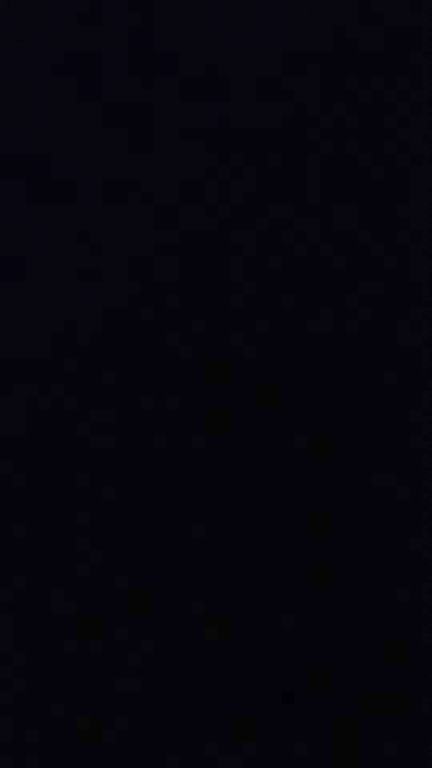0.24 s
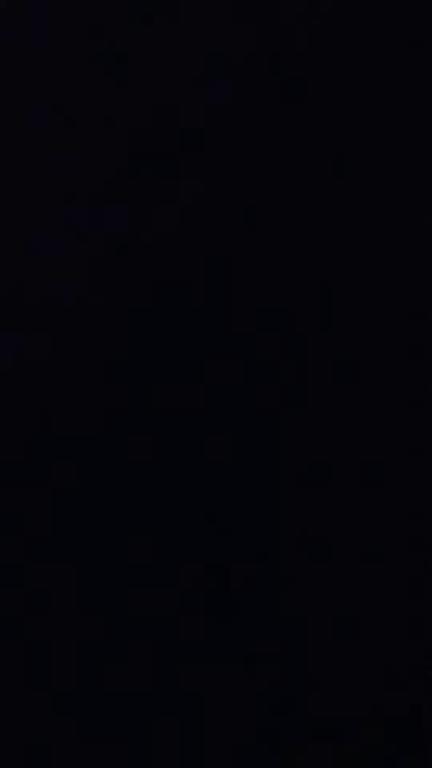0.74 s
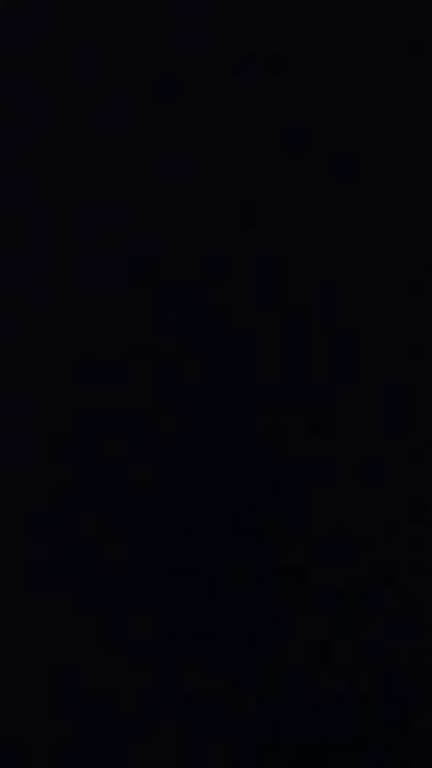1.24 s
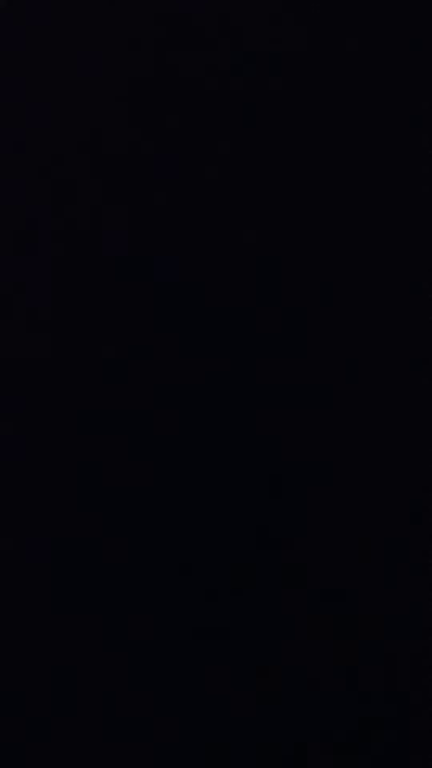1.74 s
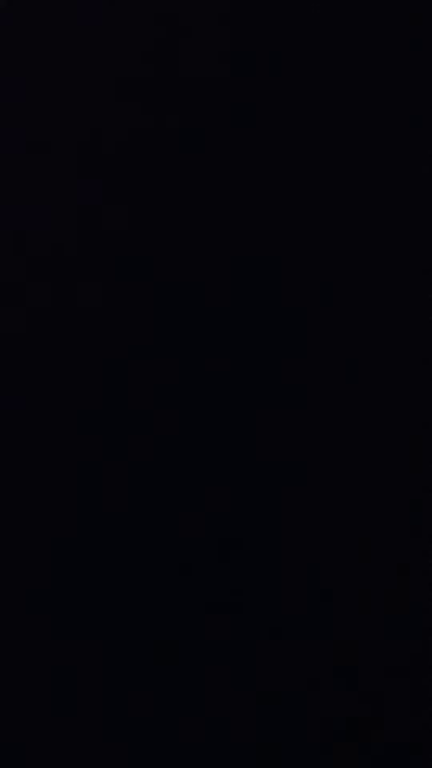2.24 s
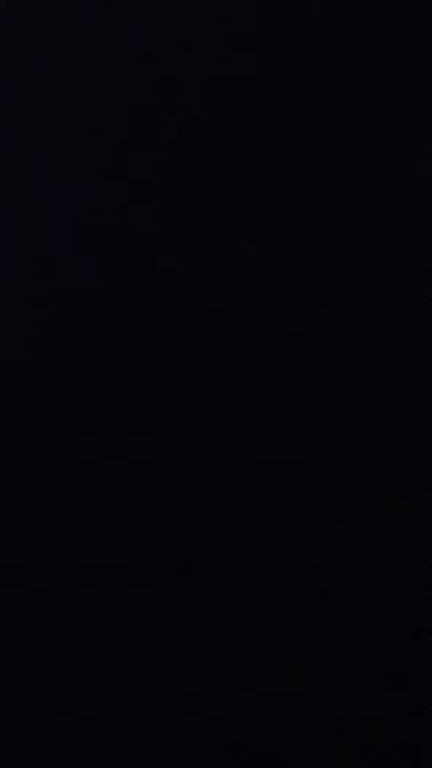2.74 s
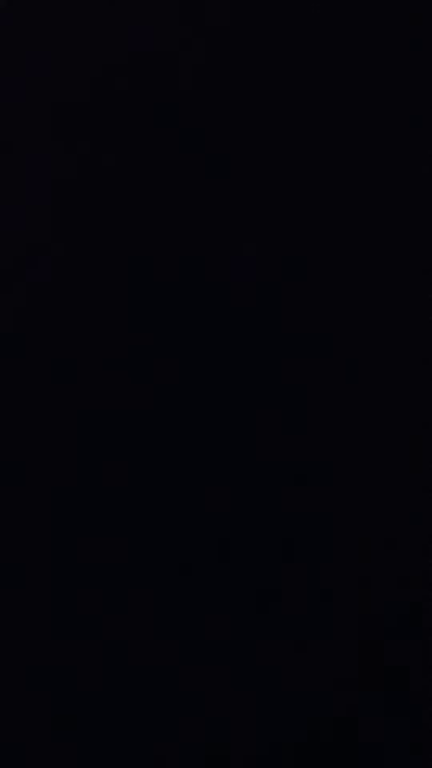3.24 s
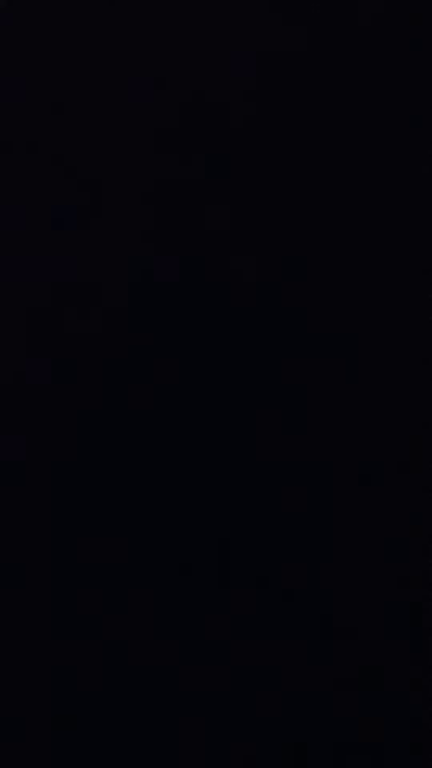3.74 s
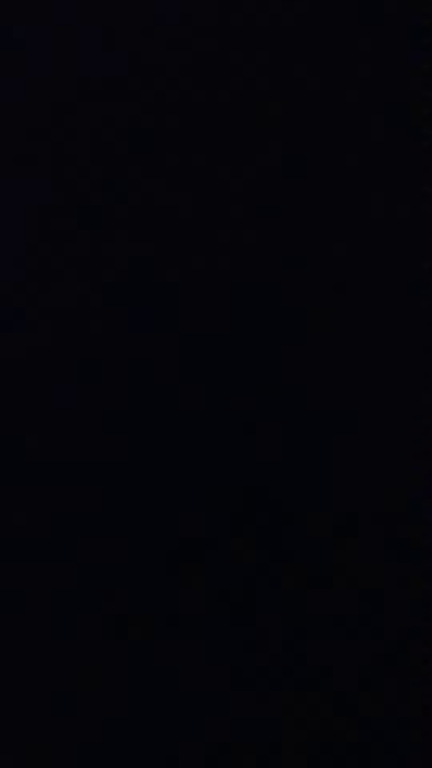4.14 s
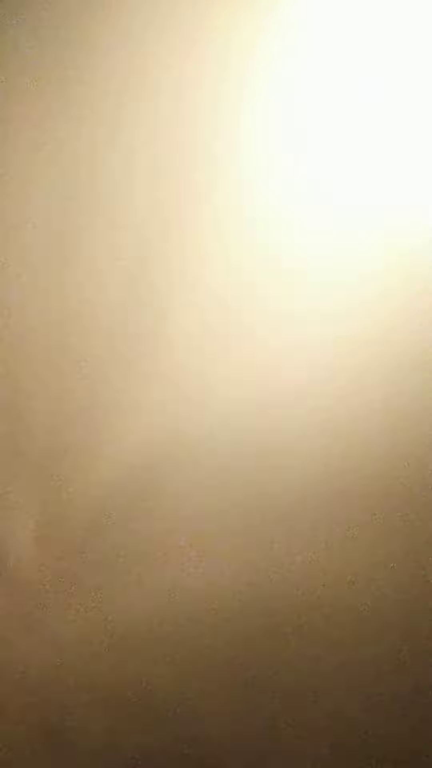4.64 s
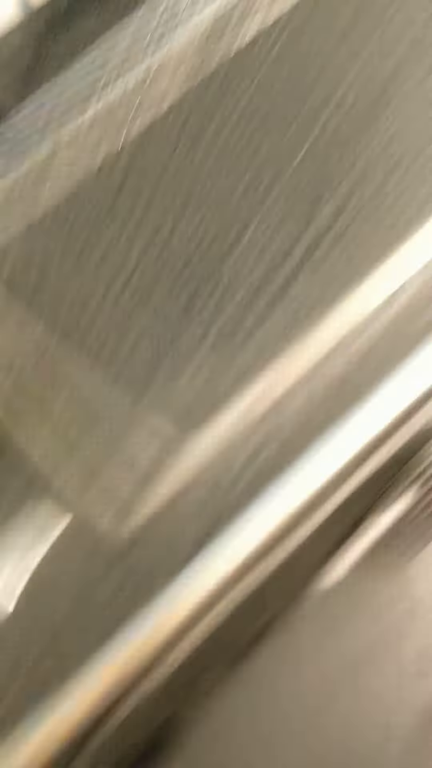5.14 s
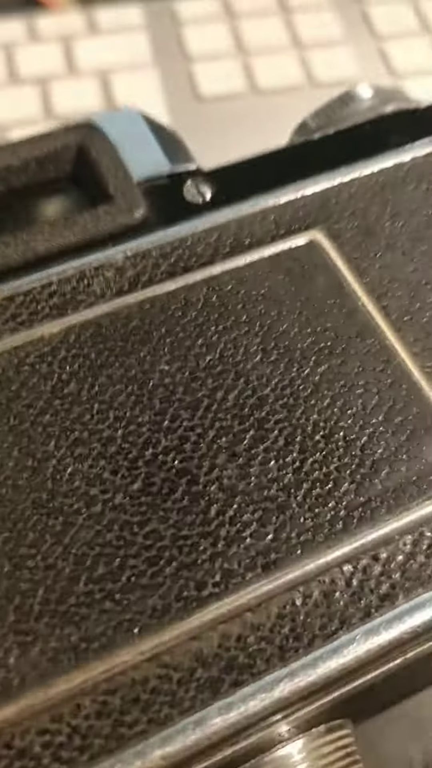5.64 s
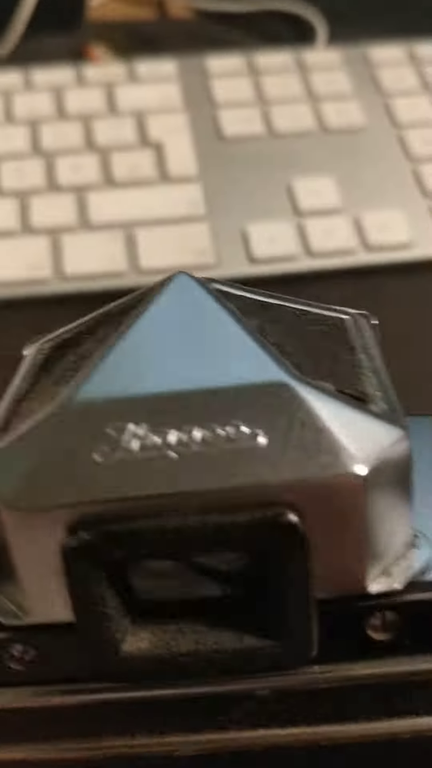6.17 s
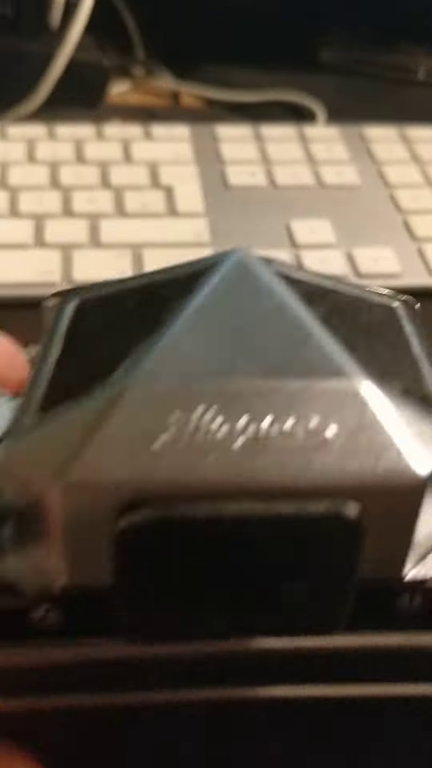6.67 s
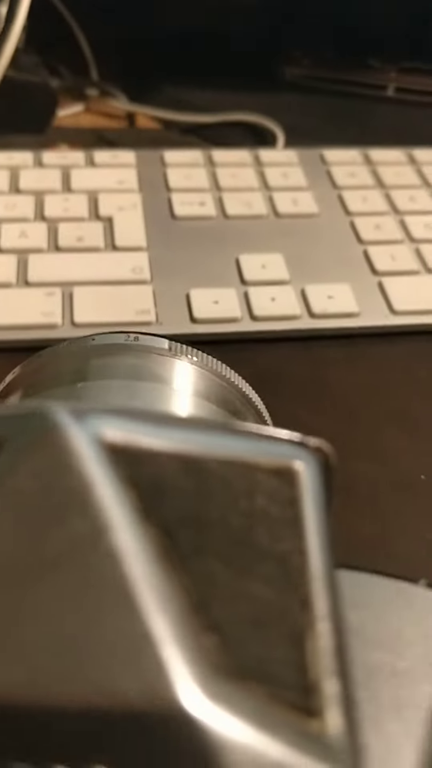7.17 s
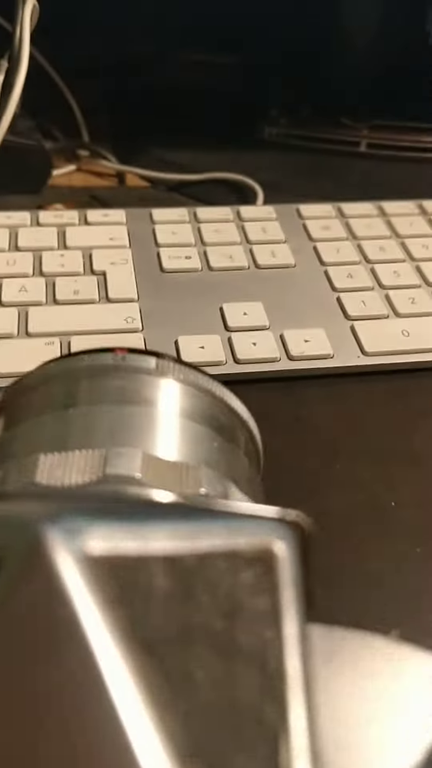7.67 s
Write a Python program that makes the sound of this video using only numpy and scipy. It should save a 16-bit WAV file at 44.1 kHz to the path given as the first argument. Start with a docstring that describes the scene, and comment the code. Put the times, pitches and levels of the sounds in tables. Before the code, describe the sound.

Blunt bumps hit the left microphone, then an old metal camera pressed against it ticks, its clockwork timer purrs for under a second, catches click and body knocks thud, and the shutter snaps loudly. After a pause, the leathery body scrapes roughly on the left, a finger thumps and fizzes on the right, and lighter ringing clicks follow in a small quiet room with soft hiss.

```python
"""Touches first bump the left microphone port of a phone against which an old metal film camera is held.
Levers tick, a timer purrs as even beats over whirring gears, the body knocks and the shutter snaps: bursts and rings.
Then the camera bumps and slides over the left port as filtered noise, and a finger wipes the right port.
Held clear of the phone, the camera ticks on in ringing clicks and the ports get faint nudges.
Throughout, a small room answers over a soft hiss, and the phone turns its gain down when it gets loud."""
import sys
import numpy as np
from scipy import signal
from scipy.fft import rfft, irfft, next_fast_len
from scipy.io import wavfile
from scipy.ndimage import map_coordinates

SR = 44100
rng = np.random.default_rng(int(sys.argv[2]) if len(sys.argv) > 2 else 0)


def store_pcm(level_fs):
    """Save levels as 16-bit WAV."""
    pcm = np.round(np.clip(level_fs, -1, 1) * 32767).astype(np.int16)
    wavfile.write(sys.argv[1], SR, np.atleast_2d(pcm).T)


N = 348831

# All levels in the tables stand before the sound is placed left or right.
# snaps of levers, catches and shutter: [t/s, basic level/dB, treble relative to it/dB,
# housing basic level/dB, housing base pitch f/Hz, left minus right/dB]; each sound adds its own trim
CLICKS = [(0.614, -43, -18, -48.5, 600, 3), (0.6455, -38.5, -15.5, -48.5, 573, 2),
          (0.676, -22.5, -33, -34.5, 570, 9), (1.074, -41, -22, -77, 544, -1),
          (1.264, -28, -20, -59, 654, 2), (1.5446, -32, -23, -55, 930, -3), (1.5688, -21, -32, -47, 734, 2),
          (1.6416, -34.5, -38, -42, 840, 0.5), (1.7207, -42, -40, -38.5, 945, 7),
          (1.785, -37, -23.5, -50, 810, -1), (2.2182, -31.5, -20, -51, 730, 0.5),
          (2.2238, -25, -28, -50, 770, -3.5), (2.2381, -32, -27, -49, 760, 2),
          (2.3068, -14.5, -22.5, -25.5, 660, 1), (2.3775, -28, -32, -46, 830, 1),
          (2.385, -34, -22, -43, 800, 4), (2.4465, -33.5, -14.5, -40.5, 597, 4),
          (2.585, -44, -21, -64, 700, 0), (2.9887, -2.5, -25.5, -21.5, 630, 3.5),
          (6.0612, -36.5, -30.5, -39, 612, 0.5), (6.3093, -30.5, -24.5, -41.5, 580, 3.5),
          (6.3327, -43, -25, -45, 705, 14), (6.4289, -15, -13.5, -40, 816, -0.5),
          (6.7238, -41.5, -33, -48, 890, -3.5), (6.7727, -29, -20, -44, 1900, -7),
          (6.78, -23, -16.5, -44, 775, -3.5), (6.7881, -38, -20, -29.5, 1396, -2.5),
          (6.821, -34.5, -28, -53.5, 530, -4), (6.854, -44, -17, -54, 784, -8),
          (6.9382, -43.5, -28, -52.5, 1510, -3), (7.012, -43, -18, -73, 894, -1.5),
          (7.1142, -42.5, -22, -59, 1200, 4), (7.2863, -54, -23, -75, 785, -4),
          (7.5737, -54, -10, -61, 570, -3), (7.8375, -43, -25.5, -52, 784, -3.5),
          (7.856, -34, -20.5, -47.5, 2200, -9)]
# colour of the brightest part of a snap: [f/Hz, relative level/dB]
SPARK = [(3000, -27), (6500, -10), (9000, -2), (13000, -1), (16000, -30)]
# colour of a fine bright fizz: [f/Hz, relative level/dB]
FIZZ = [(800, -4.5), (2500, 2.5), (5000, 2.5), (10000, -5), (13000, -11.5), (16000, -21)]
# colour of the soft swish of rubbing: [f/Hz, relative level/dB]
SWISH = [(100, -6), (500, -9.5), (1150, 0), (1900, -6), (3200, -11.5), (6000, -20), (14000, -35.5)]
# colour of gritty slips: [f/Hz, relative level/dB]
GRIT = [(800, -18.5), (2400, -2.5), (4200, -1.5), (5500, -6), (7500, -13), (13000, -20.5), (14500, -27.5),
        (16000, -46)]

LIFT_S = 5.5  # until then the body rests against the left port; after it, it is held in front
PRESSED_PAN_DB = 17  # left minus right while it rests there


def amp(db):
    """Turn decibels into a gain."""
    return 10 ** (np.asarray(db) / 20)


def unit(x):
    """Scale to rms 1."""
    return x / np.sqrt(np.mean(x ** 2) + 1e-20)


def crest(x):
    """Scale to peak 1."""
    return x / (np.abs(x).max() + 1e-20)


def along(points, hz):
    """Read a curve of (Hz, value) points on a log frequency axis."""
    f, v = np.transpose(points)
    return np.interp(np.log(hz + 1), np.log(f + 1), v)


def wobble(rate):
    """Draw a smooth random curve with the given number of knots a second."""
    knots = rng.standard_normal(int(N * rate / SR) + 4)
    return map_coordinates(knots, [np.arange(N) * rate / SR])


def colour(x, spectrum):
    """Filter x to a spectrum so that nothing sounds ahead of its cause (minimum phase)."""
    m = 2 * next_fast_len(x.shape[-1])
    gain = amp(along(spectrum, np.fft.rfftfreq(m, 1 / SR)))
    cepstrum = irfft(np.log(gain), m)
    # fold the second half onto the first: this makes the filter causal
    cepstrum[1:m // 2] *= 2
    cepstrum[m // 2 + 1:] = 0
    response = np.exp(rfft(cepstrum))
    return irfft(rfft(x, m) * response, m)[..., :x.shape[-1]]


def noise(spectrum):
    """Make coloured noise of rms 1, unrelated at the two ports."""
    return unit(colour(rng.standard_normal((2, N)), spectrum))


def grains(spectrum, rate, spread_db):
    """Make tiny slips at random moments, rate a second and of uneven size, with rms 1."""
    slips = rng.random((2, N)) < rate / SR
    sizes = amp(spread_db * rng.standard_normal((2, N))) * rng.choice([-1, 1], (2, N))
    return unit(colour(slips * sizes, spectrum))


def ports(pan_db):
    """Give left and right gains with a mean of 1 that differ by pan_db."""
    g = amp([[pan_db / 2], [-pan_db / 2]])
    return g / g.mean()


def add(track, s, sound):
    """Mix a sound into the track at time s."""
    part = track[:, round(s * SR):][:, :sound.shape[-1]]
    part += sound[..., :part.shape[1]]


def age():
    """Count the seconds since a blow, for a third of a second."""
    return np.arange(SR // 3) / SR


def ring(modes, scatter_db, detune):
    """Sum dying sine tones (Hz, dB, t60 s), struck at slightly new strengths and pitches."""
    t = age()
    out = np.zeros(len(t))
    for k, (hz, db, t60) in enumerate(modes):
        decay = amp(db + scatter_db * rng.normal() - 60 * t / t60)
        pitch_hz = hz * (1 + detune * rng.normal())
        out += (-1) ** k * decay * np.sin(2 * np.pi * pitch_hz * t)
    return out


def burst(spectrum, t60, apart):
    """Imitate the dense modes of small parts by dying noise; each port hears a share of its own."""
    t = age()[:SR // 10]
    raw = rng.standard_normal(len(t)) + apart * rng.standard_normal((2, len(t)))
    return crest(colour(raw * amp(-60 * t / t60), spectrum))


def swell(start, end, rise_db_per_s, fall_db_per_s):
    """Shape a gesture: it rises until start and falls after end; the two overlap if end comes first."""
    t = np.arange(N) / SR
    before = np.maximum(start - t, 0)
    after = np.maximum(t - end, 0)
    return amp(-rise_db_per_s * before - fall_db_per_s * after)


def lagged(x, lag_s):
    """Follow x sluggishly, with a time constant."""
    keep = np.exp(-1 / (lag_s * SR))
    return signal.lfilter([1 - keep], [1, -keep], x)


def steel_colour(s):
    """Colour of the steel parts: they sound higher through the touching body than through the air."""
    # crack of small steel parts: [f/Hz, relative level/dB]
    steel_curve = [(400, -42), (1200, -19.5), (2200, -10), (2850, -4), (3500, -8), (4400, -5), (5200, -6.5),
                   (6300, -14), (12000, -49)]
    peak_hz = 2780 if s > LIFT_S else 4350
    peak_db, peak_octaves = 4, 0.21
    hz = np.geomspace(400, 16000, 120)
    peak = peak_db * np.exp(-(np.log2(hz / peak_hz) / peak_octaves) ** 2)
    return np.transpose([hz, along(steel_curve, hz) + peak])


def mechanism():
    """A catch slips, strikes home and rebounds: steel parts crack and the housing rings."""
    # ringing of the housing: [multiple of the housing base pitch, relative level/dB, t60/s]
    housing_modes = [(0.78, -2.5, .016), (0.999, 1.5, 0.029), (1.25, -7.5, 0.03), (1.52, -10, 0.018),
                     (1.9, -14, 0.048), (2.401, -12, 0.015)]
    # song of the released shutter spring: [f/Hz, level/dB, t60/s]
    spring_modes = [(4670, -55.5, .3), (5460, -49.5, .3), (12970, -51, .42)]
    shutter_s, crack_t60_s = 2.989, 0.014
    out = np.zeros((2, N))
    for s, db, treble_db, housing_db, housing_hz, pan_db in CLICKS:
        side = ports(pan_db)
        steel = amp(db) * burst(steel_colour(s), crack_t60_s, apart=0.78)
        spark = amp(db + treble_db + 10) * burst(SPARK, crack_t60_s * 1.3, apart=1)
        modes = [(ratio * housing_hz, level, t60) for ratio, level, t60 in housing_modes]
        housing = crest(ring(modes, scatter_db=2, detune=.035))
        add(out, s - .0034, amp(-21) * side * (steel + 2 * spark))  # the slip
        add(out, s, side * (steel + spark))  # the strike
        add(out, s + .006, amp(db - 15.5) * burst(FIZZ, crack_t60_s, apart=1))  # the rebound
        add(out, s + 0.00056, amp(housing_db + 9.5) * side * housing)
    add(out, shutter_s, ring(spring_modes, scatter_db=1, detune=0))
    # the sound reaches the left port first, the right one 11 samples later
    return np.array([out[0], np.roll(out[1], 11)])


def escapement():
    """The timer purrs: its anchor beats evenly against the body while the small gears whirr."""
    # run of the slow-speed escapement: [start t/s, end t/s, beats per s]
    timer_run = (0.7065, 1.55, 30.2)
    # thud of the anchor: [f/Hz, relative level/dB, t60/s]
    anchor_modes = [(335, -2, 0.053), (160, -4, 0.041), (736, -20, 0.03)]
    # whirr of the gears: [f/Hz, relative level/dB]
    gear_curve = [(1800, -37), (2860, 1), (3400, -7), (4400, 1), (5300, 5), (6300, -2), (10000, -12.5),
                  (15000, -29)]
    start, end, rate = timer_run
    out = np.zeros((2, N))
    for s in np.arange(start, end, 1 / rate):
        beat = crest(ring(anchor_modes, scatter_db=1, detune=0.024))
        add(out, s, amp(-47) * ports(24) * beat)
        add(out, s, amp(-65) * burst(gear_curve, t60=0.05, apart=0.78))
    return out


def knocks():
    """The hand-held body thuds: soft contacts weaken its high modes, and its bass needs the phone."""
    # dull knocks: [t/s, peak level/dB, hardness f/Hz above which the modes weaken]
    knock_list = [(0.678, -26.5, 900), (0.981, -41, 300), (1.159, -39, 1200), (1.643, -22, 260),
                  (1.721, -29.5, 1900), (1.956, -39, 300), (2.375, -18.5, 394), (2.428, -27.5, 1100),
                  (2.434, -20, 199), (2.489, -34, 150), (2.509, -31.5, 400), (2.605, -45, 300),
                  (2.94, -36.5, 301), (2.992, -28.5, 300), (3.113, -37.5, 400), (3.297, -42, 497),
                  (3.486, -40.5, 701), (6.003, -46, 1800), (6.061, -45, 900), (6.077, -43.5, 1500),
                  (6.311, -35.5, 808), (6.337, -44, 900), (6.465, -37, 603), (6.508, -41, 1223),
                  (6.79, -30, 900)]
    # modes of the camera body: [f/Hz, relative level/dB, t60/s]
    body_modes = [(86, -11, 0.06), (120.4, 3.5, 0.083), (170.3, -1.5, 0.06), (220, -0.5, .05),
                  (324.6, -3.5, 0.041), (425, -2.5, 0.03505), (628, -5.5, 0.068), (846, -6.5, 0.046),
                  (1313, -15, .02), (1840, -17, 0.016)]
    free_bass_hz = 132  # held clear of the phone, the body radiates little below this
    out = np.zeros((2, N))
    for s, db, hard_hz in knock_list:
        pan_db, bass_hz = (PRESSED_PAN_DB, 0) if s < LIFT_S else (0, free_bass_hz)
        modes = []
        for hz, level, t60 in body_modes:
            softness = np.hypot(1, hz / hard_hz)
            bass_loss = np.hypot(1, (bass_hz / hz) ** 2)
            modes.append((hz, level - 20 * np.log10(softness * bass_loss), t60))
        add(out, s, amp(db) * ports(pan_db) * crest(ring(modes, scatter_db=1, detune=0.04)))
    return out


def bumps_and_sharp_snaps():
    """A touch pumps the air over a port, a sharp snap of the mechanism rings high; both add a tick."""
    # touches on the ports (low rings) and, at 1.6416 and 1.7201 s, short snaps of the mechanism (high
    # rings): [t/s, ring peak level/dB, ring f/Hz, ring t60/s, tick relative to ring/dB,
    # tick edge f/Hz above which it weakens, left minus right/dB]
    hit_list = [(0.1573, -5.5, 427, 0.026, -5, 1825, 11.5), (0.1777, -11.5, 393, 0.024, -5.5, 6000, 18.5),
                (0.1894, -6.5, 343, 0.048, -1.5, 9000, 18.5), (0.2028, -3.5, 282.4, .04, -5, 4500, 18),
                (1.6416, -37, 3500, 0.012, -3, 9000, 6), (1.7201, -41, 2210, .009, 14.5, 3200, -5),
                (4.1155, -12.5, 195, 0.023, 2.5, 1450, 24), (4.496, -27.5, 770, 0.022, 7.5, 1470, 27.5),
                (4.5212, -2, 117, 0.02, -13, 3500, 27.5), (4.5802, -1.5, 144, 0.047, -9, 850, 31),
                (4.891, -7.5, 244, .014, -9, 3000, -35.5), (4.898, -2.5, 201, 0.0062, -12, 3100, -34.5),
                (4.905, -3, 260, 0.011, -5, 3936, -35), (4.917, 0, 267.6, 0.0088, -5.5, 3600, -32.5),
                (6.433, -24.5, 166.4, 0.056, -4.5, 1500, 4)]
    # colour of the tick: [f/Hz, relative level/dB]
    tick_curve = [(200, -15), (900, 3.5), (2000, -9.5), (4500, -10), (8000, -23.5), (15000, -29)]
    out = np.zeros((2, N))
    for s, db, hz, t60, tick_db, edge_hz, pan_db in hit_list:
        # the last mode is a faint, lower and longer ring behind the hit
        modes = [(hz, 0, t60), (hz * 2.1, -7, t60 / 2), (hz * 0.78, -27, t60 * 6)]
        tone = crest(ring(modes, scatter_db=4, detune=.01))
        softened = [(f, level - 20 * np.log10(1 + (f / edge_hz) ** 2)) for f, level in tick_curve]
        tick = burst(softened, t60=0.011, apart=0.42)
        add(out, s, amp(db) * ports(pan_db) * tone)
        add(out, s, amp(db + tick_db) * ports(pan_db) * tick)
    return out


def rubbing():
    """Leatherette sticks and slips on the left port: more friction, more grit, scratches, swish, rumble."""
    # the camera slides over the port: [t/s, friction level/dB]
    slide_path = [(3.99, -74.8), (4.015, -61.5), (4.09, -52.0), (4.16, -40.5), (4.19, -38.5), (4.225, -32),
                  (4.28, -36.5), (4.35, -39.5), (4.42, -37), (4.47, -42), (4.505, -37), (4.57, -30),
                  (4.62, -34), (4.67, -33), (4.705, -45)]
    # it bears down: [start t/s, end t/s, rumble level at 0 dB of friction/dB]
    press_list = [(4.022, 4.017, -30.5), (4.065, 4.114, -22.5), (4.2, 4.602, -21.5)]
    # colour of the rumble: [f/Hz, relative level/dB]
    rumble_curve = [(25, -10), (140, 2), (300, -2), (380, -10.5), (520, -3), (800, -7), (1600, -42),
                    (4000, -89.5)]
    land_db_per_s = 384  # how fast the pressure lands and lifts
    press_follows = 0.29  # dB of rumble per dB of friction
    times, levels = np.transpose(slide_path)
    friction = amp(np.interp(np.arange(N) / SR, times, levels, left=-150, right=-150))
    weight = sum(amp(db) * swell(start, end, land_db_per_s, land_db_per_s)
                 for start, end, db in press_list)
    surge = amp(2.5 * wobble(30))  # the pressure of the hand is uneven
    press = weight * friction ** press_follows * surge * noise(rumble_curve)
    skin = amp(-1) * grains(SWISH, rate=2500, spread_db=5) * amp(2.3 * wobble(35))
    grit = grains(GRIT, rate=4000, spread_db=0.5) * amp(1.2 * wobble(180))
    texture = amp(-0.5) * unit(grit)
    scratches = amp(-5) * grains(GRIT, rate=220, spread_db=4)
    return ports(17) * (press + friction * (skin + texture + scratches))


def snags():
    """The leatherette snags on the rim of the left port: single sharp slips, as bursts of grit."""
    # [t/s, peak level/dB, t60/s]
    snag_list = [(4.1758, -11, 0.006), (4.1865, -23.5, 0.031), (4.218, -16, 0.017), (4.2518, -15, 0.0036),
                 (4.5965, -18, 0.0046)]
    out = np.zeros((2, N))
    for s, db, t60 in snag_list:
        add(out, s, amp(db) * ports(14) * burst(GRIT, t60, apart=0.32))
    return out


def strokes():
    """The camera brushes the left port as it comes away; every stroke swells and fades at the same rates."""
    # light strokes: [start t/s, end t/s, swish level/dB]
    stroke_list = [(4.731, 4.752, -31), (4.815, 4.877, -38), (5.081, 5.082, -54), (5.23, 5.234, -42),
                   (5.308, 5.325, -45), (5.391, 5.449, -50), (5.505, 5.549, -56.5), (6.243, 6.25, -56)]
    rise_db_per_s, fall_db_per_s, grit_db = 600, 379, -17.5
    touch = sum(amp(db) * swell(start, end, rise_db_per_s, fall_db_per_s)
                for start, end, db in stroke_list)
    return ports(15.5) * touch * (noise(SWISH) + amp(grit_db) * noise(GRIT))


def wipe():
    """A finger fizzes over the rim of the right port, flutters on it and leaves with a low boom."""
    # [finger lands t/s, finger leaves t/s]
    wipe_times = (4.892, 4.922)
    # air trapped under the finger: [f/Hz, relative level/dB]
    flutter_curve = [(25, -34.5), (300, 3.5), (900, -6.5), (1800, -12.5), (4000, -17.5), (9000, -59)]
    # the port is uncovered: [f/Hz, level/dB, t60/s]
    boom_modes = [(35.1, -27.5, 0.31)]
    flutter_db, flutter_db_per_s = -17.5, 1300
    fizz_db, fizz_rise_db_per_s, fizz_fall_db_per_s = -31.5, 597.5, 1001
    fizz_lead_s = 0.016  # skin reaches the rim first
    lands, leaves = wipe_times
    flutter_gain = swell(lands, leaves, flutter_db_per_s, flutter_db_per_s)
    fizz_gain = swell(lands - fizz_lead_s, leaves, fizz_rise_db_per_s, fizz_fall_db_per_s)
    out = amp(flutter_db) * flutter_gain * noise(flutter_curve)
    out += amp(fizz_db) * fizz_gain * noise(FIZZ)
    add(out, leaves, ring(boom_modes, scatter_db=5, detune=.02))
    return ports(-40) * out


def grip():
    """Fingers creep on the camera: low nudges, mostly at the port it rests on, and a grainy rustle."""
    # the fingers tighten or shift: [start t/s, end t/s, murmur of the body/dB, finger rustle/dB],
    # both levels before the boosts in the last line
    grip_list = [(0, 0.046, -55, -60), (0.135, 0.225, -50, -59.5), (0.582, 1.844, -61, -81),
                 (1.965, 2.009, -63, -67), (2.37, 2.486, -53.5, -61), (2.6, 3.46, -66.5, -78.5),
                 (3.47, 3.582, -65.5, -71.5), (5.83, 5.927, -64.5, -71), (6.316, 6.5, -56.5, -68),
                 (6.55, 6.85, -62, -74), (7.1, 7.496, -78.5, -72)]
    # colour of the murmur: [f/Hz, relative level/dB]
    murmur_curve = [(25, -3.5), (120, 0.5), (230, -6.5), (330, -4), (450, -7), (800, -11.5), (2000, -49)]
    # colour of the rustle: [f/Hz, relative level/dB]
    rustle_curve = [(800, -9), (2500, -1), (5000, -6), (6500, -19.5), (11000, -11), (16000, -25)]
    rise_db_per_s, fall_db_per_s = 182, 151
    murmur, rustle = np.zeros((2, N)), np.zeros(N)
    for start, end, murmur_db, rustle_db in grip_list:
        effort = swell(start, end, rise_db_per_s, fall_db_per_s)
        side = ports(PRESSED_PAN_DB if start < LIFT_S else 0)
        murmur = np.maximum(murmur, amp(murmur_db) * effort * side)
        rustle = np.maximum(rustle, amp(rustle_db) * effort)
    steady = noise(murmur_curve) * amp(-2.5 + 2.1 * wobble(25))
    nudges = grains(murmur_curve, rate=60, spread_db=3.5)
    low = murmur * unit(steady + nudges)
    high = rustle * unit(grains(rustle_curve, rate=1400, spread_db=3) * amp(2.8 * wobble(12)))
    return amp(1.5) * low + amp(2.9) * high


def sway():
    """The phone sways in the hand and draughts nudge its ports: faint, sparse low thumps."""
    # [start t/s, end t/s, level/dB]
    sway_span = (5.0, 7.9, -62)
    # colour of the draughts: [f/Hz, relative level/dB]
    draught_curve = [(25, 2.5), (60, -2.5), (110, -11.5), (300, -39.5)]
    start, end, db = sway_span
    return amp(db) * swell(start, end, 200, 40) * grains(draught_curve, rate=30, spread_db=2)


def radiated():
    """Summed over all directions, each snap reaches the walls as smooth filtered pulses."""
    # sound sent out in all directions: [f/Hz, relative level/dB]
    outward_curve = [(200, -9.5), (620, 2.5), (900, -3), (1600, -12), (2300, -5.5), (2900, -5.5),
                     (3600, -4.5), (4700, -4), (5500, -6.5), (6500, -13), (13000, -19.5), (15000, -30.5)]
    walls_db, walls_spark_db = 3.5, 8
    housing_share = .3  # a snap that shakes the housing carries further into the room
    pulse = signal.unit_impulse(SR // 10)
    crack = colour(pulse, outward_curve)
    crack /= np.linalg.norm(crack)
    spark = colour(pulse, SPARK)
    spark /= np.linalg.norm(spark)
    out = np.zeros((2, N))
    for s, db, treble_db, housing_db, *_ in CLICKS:
        crack_db = db + housing_share * (housing_db - db) + walls_db
        add(out, s, amp(crack_db) * crack)
        add(out, s + 0.0022, amp(db + treble_db + walls_spark_db) * spark)
    return out


def room(x):
    """The room answers with a short tail of noise, different at each port, whose pitches die unequally."""
    # [f/Hz, t60/s]
    room_t60 = [(120, 0.6), (600, 0.41), (2000, 0.23), (5000, .39), (13000, 0.08)]
    hz, t, z = signal.stft(rng.standard_normal((2, SR // 2)), SR, nperseg=256)
    fade = amp(-60 * t / along(room_t60, hz)[:, None])
    tail = signal.istft(z * fade, SR, nperseg=256)[1]
    tail /= np.linalg.norm(tail[0])
    late = np.pad(x.mean(axis=0), (SR // 200, 0))  # the answer starts 5 ms late
    return signal.fftconvolve(late[None], tail, axes=1)[:, :N]


def hiss():
    """A soft steady hiss: coloured noise, unrelated at the two ports."""
    # [f/Hz, relative level/dB]
    air_curve = [(25, 9), (60, 0), (100, -8), (200, 0.5), (450, -4.5), (800, -7), (1200, -12),
                 (2500, -17.5), (5400, -23), (7000, -28.5), (12000, -29.5), (16000, -41)]
    return amp(-58.5) * noise(air_curve)


def scene():
    """Camera, hands and room together."""
    thuds = knocks()
    echo = room(radiated() + amp(-13) * thuds)
    camera = mechanism() + escapement() + thuds
    touches = rubbing() + snags() + strokes() + wipe() + grip() + sway()
    return camera + bumps_and_sharp_snaps() + touches + echo + hiss()


def auto_gain(x):
    """Loud moments make the phone turn its gain down; it creeps back at a steady pace."""
    threshold_db, cut_db_per_db = -18.5, 0.68  # where it turns down, and how much per dB over
    sense_s, attack_s, recover_db_per_s = 0.024, 0.054, 14
    level_db = 10 * np.log10(lagged(np.max(x ** 2, axis=0), sense_s) + 1e-12)
    over_db = cut_db_per_db * np.maximum(level_db - threshold_db, 0)
    # hold the largest cut so far, less what has been recovered since
    recovery_db = recover_db_per_s * np.arange(N) / SR
    cut_db = np.maximum.accumulate(over_db + recovery_db) - recovery_db
    return x * amp(-lagged(cut_db, attack_s))


def record(dry):
    """The phone rides its gain, rounds off high peaks, weakens the deepest bass and cuts the top treble."""
    low_hz, top_hz = 22, 15900
    ridden = auto_gain(dry)
    held = ridden / (1 + (ridden / .9) ** 6) ** (1 / 6)  # peaks stay below 0.9
    m = next_fast_len(N + SR // 2)
    hz = np.fft.rfftfreq(m, 1 / SR)
    bass_block = 1j * hz / (low_hz + 1j * hz)
    return irfft(rfft(held, m) * bass_block * (hz < top_hz), m)[:, :N]


dry = scene()
out = record(dry)
store_pcm(out)
```